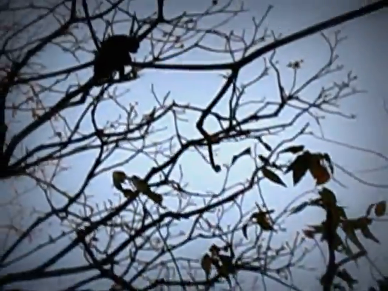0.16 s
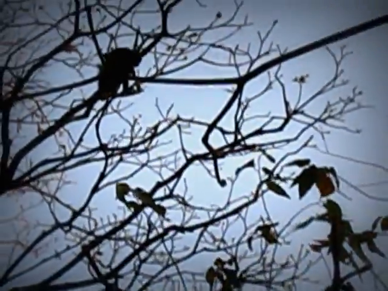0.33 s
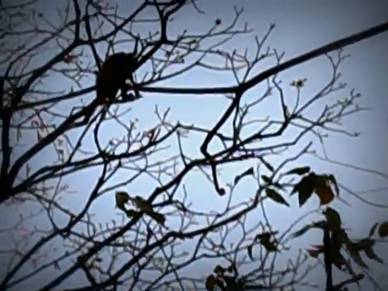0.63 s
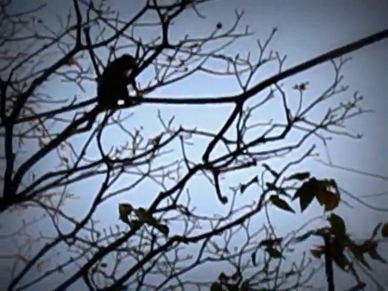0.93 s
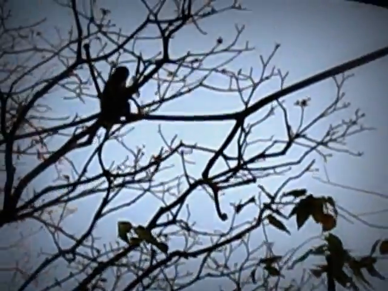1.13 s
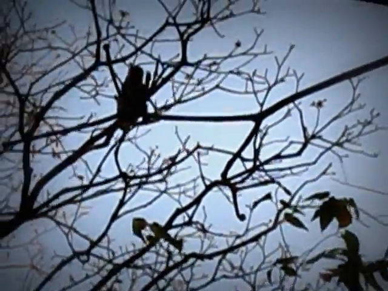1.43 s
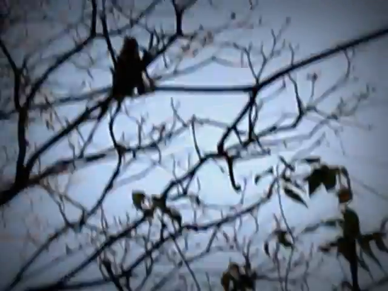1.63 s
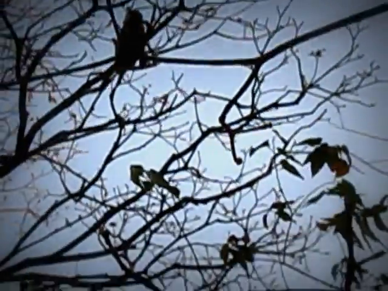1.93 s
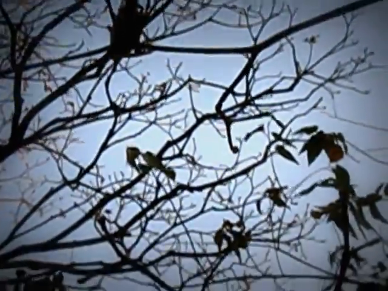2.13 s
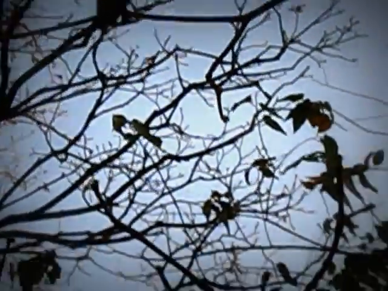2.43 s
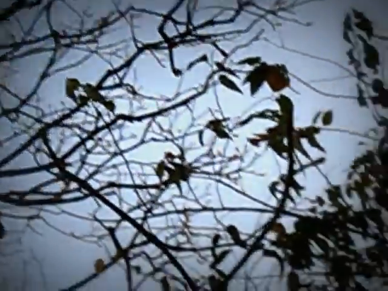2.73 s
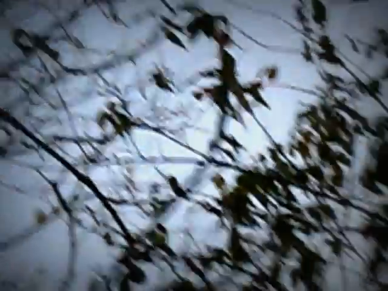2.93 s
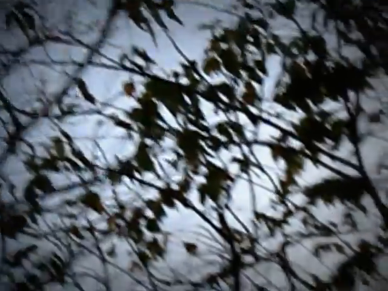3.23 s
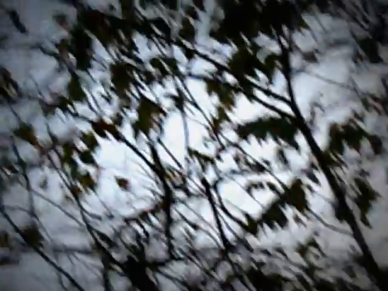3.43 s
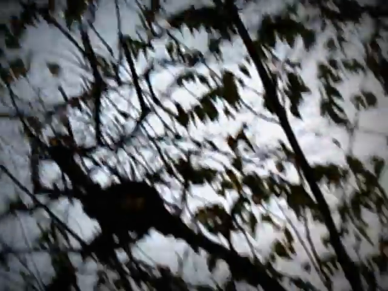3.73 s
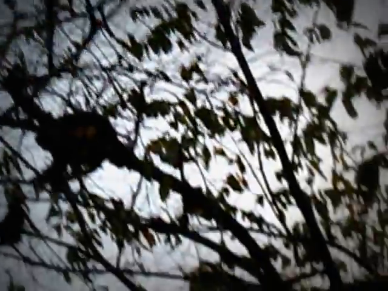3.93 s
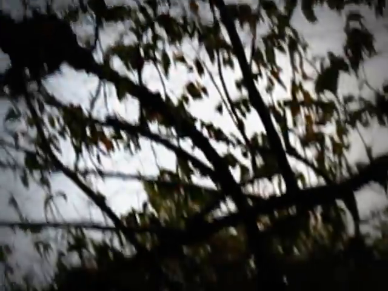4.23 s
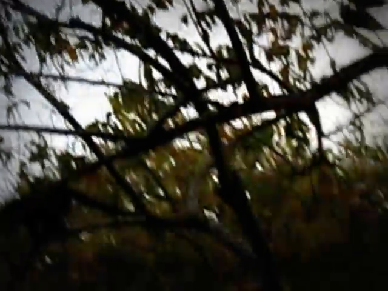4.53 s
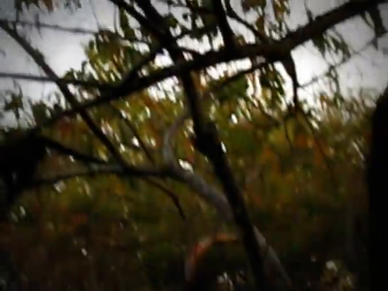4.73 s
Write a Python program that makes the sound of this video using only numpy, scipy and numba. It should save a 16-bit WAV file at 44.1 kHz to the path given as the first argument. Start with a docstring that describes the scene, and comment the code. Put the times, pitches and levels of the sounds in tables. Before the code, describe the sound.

One long guttural monkey roar fills the start, swelling unevenly with breathy heaves, rough barks from another animal and near-clear hoots, the strongest around 2.6 seconds. It then loses power, flutters in quick throbs, and dies in a low, breathy rumble before five seconds. The calls have a short, dull reverberation among trees. Soft hiss, slight wind on the microphone, and a few quiet bird notes and twig ticks surround them.

```python
"""Howler monkeys in bare treetops

A troop roars and dies away into a throbbing growl: chaotic vocal pulses ring the hyoid chamber, throat and
mouth, and lock at times into hoots, sine tones with an octave. A second animal barks hoarse syllables:
steadier pulses through band-pass resonances. Gliding sines make bird notes, narrow noise an insect's buzz,
decaying cosines and noise twig ticks; coloured noise makes the forest's hiss and the wind's rumble."""
import sys
import numpy as np
from scipy import signal
from scipy.fft import rfft, irfft
from scipy.io import wavfile
from scipy.ndimage import uniform_filter1d
from numba import njit

SR = 44100
rng = np.random.default_rng(int(sys.argv[2]) if len(sys.argv) > 2 else 0)


def magnitude_from_level(level_db):
    """Linear magnitude for a level in decibels (20 dB per decade)."""
    exponent = np.asarray(level_db, float) / 20
    return 10 ** exponent


def unload_audio(sound):
    """Save the sound as a 16-bit wav file, at the path given as the first command line argument."""
    columns = np.transpose(np.atleast_2d(sound))
    # keep every value between -1 and 1, then stretch to whole-number steps
    steps = np.round(np.clip(columns, -1, 1) * 32767)
    wavfile.write(sys.argv[1], SR, steps.astype(np.int16))


N = 214582

# heaves, when the breath is pushed out through a wide mouth: start_s, length_s, level_db
HEAVES = [(0.44, 0.46, -29), (1.126, 0.37, -28.5), (1.758, 0.42, -28)]


def level(x, db):
    """Normalization: scale a signal to an rms level."""
    return x * magnitude_from_level(db) / np.sqrt(np.mean(x ** 2))


def curves(rows):
    """Linear interpolation: the columns of a table as one value per sample."""
    s, *columns = np.transpose(rows)
    return [np.interp(np.arange(N) / SR, s, c) for c in columns]


def walk(rate):
    """Band-limited fluctuation: random levels held 1 / rate s and slewed twice; spread near 1."""
    hold = int(SR / rate)
    steps = np.repeat(rng.standard_normal(N // hold + 1), hold)
    return 1.3 * uniform_filter1d(uniform_filter1d(steps, hold), hold)[:N]


def window(t, start, length, edge=0.21):
    """Amplitude gating: linear ramps, each a share (edge) of the length, soften both ends."""
    return np.clip(np.minimum(t - start, start + length - t) / (edge * length), 0, 1)


@njit
def svf(x, hz, width):
    """State-variable filter: a band-pass with moving centre and width, gain 1 at the centre."""
    y, b, l = np.empty(len(x)), 0., 0.
    for i in range(len(x)):
        g, k = np.tan(np.pi * hz[i] / SR), width[i] / hz[i]
        v = (b + g * (x[i] - l)) / (1 + g * (g + k))
        b, l, y[i] = 2 * v - b, l + 2 * g * v, k * v
    return y


def ring(x, hz, width, skirt=6.0):
    """Cavity resonance: two band-passes in series, the second skirt times as wide, at unit level."""
    hz = hz + np.zeros(len(x))
    width = np.maximum(width, 10) + np.zeros(len(x))
    return level(svf(svf(x, hz, width), hz, skirt * width), 0)


def core(hz, waver_hz):
    """Frequency modulation: the wavering tone at the heart of a resonance, at unit level."""
    return np.sqrt(2) * np.sin(2 * np.pi * np.cumsum(hz + waver_hz) / SR)


def colour(x, points):
    """Spectral shaping: weight a sound by (Hz, dB) points on a log-frequency axis, at unit level."""
    hz, db = np.transpose(points)
    bins = np.maximum(np.fft.rfftfreq(N, 1 / SR), 1)
    gain = magnitude_from_level(np.interp(np.log(bins), np.log(hz), db))
    return level(irfft(rfft(x) * gain, N), 0)


@njit
def fire(hz, stretch, size):
    """Relaxation oscillation: a pulse at each wrap of the phase; each cycle has its own length and size."""
    pulses, p, k = np.zeros(len(hz) + 1), 0., 0
    for i in range(len(hz)):
        step = hz[i] * stretch[k] / SR
        p += step
        if p >= 1:
            p, k = p - 1, k + 1
            # two neighbouring samples share the pulse, which falls between them
            pulses[i] += size[k] * p / step
            pulses[i + 1] += size[k] * (1 - p / step)
    return pulses[:-1]


def folds(hz, jitter, scatter_db, noise_db, flutter_db):
    """Glottal source: vocal folds give uneven pulses and turbulent air, fluttering together."""
    chance = rng.standard_normal((N // 40, 2)).T
    pulses = fire(hz + np.zeros(N), np.exp(jitter * chance[0]), magnitude_from_level(scatter_db * chance[1]))
    turbulence = level(rng.standard_normal(N), noise_db)
    return (level(pulses, 0) + turbulence) * magnitude_from_level(flutter_db * walk(18))


def heaving(t):
    """Breath drive: how far the breath is heaved out, 0-1."""
    return sum(window(t, s, length, edge=0.055) for s, length, db in HEAVES)


def syllables(rows, t, edge):
    """Phrasing: successive rows as gate, progress 0-1, gliding pitch and level."""
    current = np.maximum(np.searchsorted([r[0] for r in rows], t) - 1, 0)
    s, length, first_hz, last_hz, db = np.transpose(rows)[:, current]
    along = np.clip((t - s) / length, 0, 1)
    return window(t, s, length, edge), along, first_hz + (last_hz - first_hz) * along, db


def forest_hiss():
    """Broadband noise: the forest hisses with a coloured spectrum and a slowly wavering level."""
    # spectrum of the hiss: frequency_hz, density_db (dB per Hz)
    forest_points = [(88, -51), (150, -0.5), (473, 7), (2290, -0.5), (2420, -4), (3250, -8.5), (3510, -3.5),
                     (6410, -13), (8100, -10), (15700, -24.5)]
    return magnitude_from_level(-38.5 + 1.5 * walk(12)) * colour(rng.standard_normal(N), forest_points)


def wind():
    """Flow noise: a light breeze rumbles in the microphone port as a gust dies exponentially."""
    gust_db = 12.5 * np.exp(-np.arange(N) / SR / 0.85)
    return magnitude_from_level(-57 + gust_db + 1.5 * walk(4)) * ring(rng.standard_normal(N), 82.0, 135.0, skirt=1.8)


def neighbours(t):
    """Small radiators: gliding tones for a bird, narrow noise for an insect, damped impulses for twigs."""
    # bird notes: start_s, length_s, first_hz, last_hz, level_db
    bird_notes = [(3.675, .05, 2200, 1750, -39), (3.69, .065, 2850, 2150, -37),
                  (3.912, .085, 2500, 1550, -34), (3.97, .04, 2600, 2200, -41),
                  (4.02, .04, 1780, 1700, -42), (4.54, .07, 1450, 1080, -44)]
    # thin insect buzz: start_s, length_s, centre_hz, width_hz, level_db
    insect_buzz = [(3.725, .018, 6700, 400, -47), (3.75, .06, 7300, 250, -50), (3.77, .08, 6780, 250, -50),
                   (4.12, .2, 6450, 300, -48), (4.125, .2, 9950, 400, -53)]
    # dry twig ticks: start_s, level_db, brightness_hz
    twig_ticks = [(1.3795, -32, 9100), (4.345, -16, 2250), (4.7336, -38, 8080)]
    out = np.zeros(N)
    for s, length, first_hz, last_hz, db in bird_notes:
        hz = np.interp(t, [s, s + length], [first_hz, last_hz])
        envelope = magnitude_from_level(db) * window(t, s, length, edge=.3) * magnitude_from_level(2.5 * walk(120))
        out += envelope * np.sin(2 * np.pi * np.cumsum(hz + 30 * walk(200)) / SR)
    for s, length, hz, width, db in insect_buzz:
        out += magnitude_from_level(db) * window(t, s, length) * ring(rng.standard_normal(N), hz, width)
    age = np.arange(400) / SR
    for s, db, hz in twig_ticks:
        modes = np.cos(2 * np.pi * hz * age) - np.cos(2 * np.pi * .62 * hz * age)
        snap = np.exp(-age / .002) * (modes + .1 * rng.standard_normal(400))
        # the dry crack
        snap += .6 * np.exp(-age / .0015) * uniform_filter1d(rng.standard_normal(400), size=6)
        out[int(s * SR):int(s * SR) + 400] += magnitude_from_level(db) * snap
    return out


def trees(x):
    """Reverberation: trunks and leaves scatter the calls into a short, dull, exponentially dying tail."""
    t60_s = 0.45
    age = np.arange(int(t60_s * SR)) / SR
    dull = uniform_filter1d(rng.standard_normal(len(age)), size=3)
    tail = dull * magnitude_from_level(-60 * age / t60_s) * (age > .012)
    return x + magnitude_from_level(-12.5) * signal.fftconvolve(x, tail / np.linalg.norm(tail))[:N]


def barks(t):
    """Source-filter voice: a second animal's steadier pulses give low partials and ring bright mouth modes."""
    # barked syllables: start_s, length_s, first_pulse_hz, last_pulse_hz, level_db
    bark_rows = [(.115, 0.27, 320, 334, -38), (.48, 0.17, 316.4, 262, -41), (.893, .22, 335.5, 330, -36.5),
                 (1.228, 0.19, 339.4, 322, -35), (1.505, 0.212, 317.4, 324, -36.5),
                 (1.825, 0.21, 348, 272, -35)]
    # bright mouth resonances: centre_hz, width_hz, relative_db
    bark_modes = [(4144, 390, 2), (4640, 470, 1), (3300, 66, -3)]
    gate, along, hz, db = syllables(bark_rows, t, edge=0.09)
    heave = heaving(t)
    # each syllable has an accent; in a heave it comes late
    place = np.where(heave > .5, 0.835, 0.19)
    accent_db = np.where(heave > .5, 6.5, 9.1)
    accent = np.exp(-((along - place) / 0.065) ** 2)
    # at the accent the pulses lock and the partials stand clear
    source = folds(hz, jitter=.025, scatter_db=2., noise_db=-2., flutter_db=2.)
    clear = folds(hz, jitter=.003, scatter_db=1., noise_db=-20., flutter_db=1.)
    locked = accent * (0.69 + 0.46 * heave)
    mouth = (1 - 0.8 * locked) * source + magnitude_from_level(3.5) * locked * clear
    bright = sum(magnitude_from_level(mode_db) * ring(mouth, f, w, skirt=0.84) for f, w, mode_db in bark_modes)
    bright *= magnitude_from_level(accent_db * accent + 1.8 * walk(70.5))
    nose = magnitude_from_level(-11.5 + 15.9 * heave) * ring(source, 1935, 54.0)
    first = magnitude_from_level(np.interp(along, [0, 1], [10.5, 10.8])) * ring(source, hz, 49.0)
    third = magnitude_from_level(np.interp(along, [0, 1], [1.5, 4.3])) * ring(source, 3 * hz, 52.0)
    return gate * magnitude_from_level(db) * (bright + nose + first + third)


def hoots(t):
    """Mode locking: where the folds lock to the chamber one hears a nearly clear note and its octave."""
    # clear notes: start_s, length_s, first_hz, last_hz, level_db
    hoot_rows = [(.05, 0.38, 406.7, 392, -23), (.81, 0.41, 395, 364.3, -16.5),
                 (1.48, 0.12, 385.7, 374.5, -17), (1.6, 0.24, 369.2, 352, -19),
                 (2.085, .385, 418.5, 414.7, -17), (2.47, 0.12, 461.1, 482, -18.5),
                 (2.59, 0.27, 481.8, 426.5, -13)]
    gate, along, hz, db = syllables(hoot_rows, t, edge=0.034)
    phase = 2 * np.pi * np.cumsum(hz * (1 + 0.008 * walk(60.02))) / SR
    # the octave is loudest at 709 Hz, where the throat favours it, and 6 dB less 38 Hz away
    octave_db = -0.4 - 6 * np.abs(2 * hz - 709) / 38
    note = np.sin(phase) + magnitude_from_level(octave_db) * np.sin(2 * phase)
    return np.sqrt(2) * gate * magnitude_from_level(db + 1.54 * walk(45.25)) * note


def throbbing(t):
    """Amplitude modulation: the level in dB rises at each throb of the growl and sinks between."""
    # throbs: time_s, peak_db
    throbs = [(3.335, 4), (3.39, 4), (3.44, 4), (3.495, 4), (3.512, 3), (3.562, 2), (3.61, 3), (3.663, 3),
              (3.718, 3), (3.775, 3), (3.845, 4), (3.922, 3), (3.972, 3)]
    # level between the throbs: time_s, dip_db
    growl_dips = [(3.27, 0), (3.33, -4), (3.55, -7), (3.8, -6), (3.95, -3), (4.02, 0)]
    dip_db = curves(growl_dips)[0]
    gaps_s = np.gradient(np.transpose(throbs)[0])
    throb_db = dip_db
    for (s, db), gap_s in zip(throbs, gaps_s):
        throb_db = throb_db + (db - dip_db) * np.exp(-((t - s) / (0.51 * gap_s)) ** 2 * 2)
    return throb_db


def deep_cavities(t, source, growl, centres_hz, levels_db):
    """Coupled resonators: chamber and throat ring in opposite polarity, each with a wavering core."""
    # the loudest brief swells of the roar's uneven flutter;
    # a list for the chamber, then one for the throat: time_s, peak_db
    swell_rows = ([(.04, -13), (.096, -9), (.385, -9), (.45, -20), (.49, -12), (.557, -13.5), (.721, -14),
                  (.821, -12), (.873, -13.5), (1.117, -11), (1.249, -22), (1.306, -26), (1.349, -11),
                  (1.403, -13), (1.46, -11), (1.735, -11), (1.819, -14), (1.864, -19), (2.102, -8.5),
                  (2.207, -29), (2.278, -12.5), (2.355, -15), (2.418, -18), (2.475, -9), (3.144, -21.5),
                  (3.19, -21), (3.565, -19), (3.615, -25), (3.665, -26), (4.612, -30)], [(.024, -34),
                  (.065, -32), (.187, -20), (.447, -16), (.484, -21), (.61, -14), (.647, -26), (.695, -21),
                  (.94, -19.5), (1.343, -20), (1.456, -21), (1.544, -16), (1.632, -15.5), (1.784, -13),
                  (1.912, -13), (1.999, -12.5), (2.063, -11.5), (2.31, -14), (2.4, -13.5), (2.64, -16),
                  (2.846, -11), (2.891, -14), (2.983, -15.5), (3.133, -13), (3.214, -21), (3.512, -26),
                  (3.61, -23), (3.663, -22), (3.72, -23), (3.775, -22), (3.922, -26), (4.575, -30),
                  (4.612, -26)])
    widths_hz = (46, 89.9)
    # the last breath loses tone and the cavities ring wider
    spent = np.interp(t, (3.95, 4.15), [0, 1])
    wider = 1.35 ** spent
    (chamber_hz, throat_hz), (chamber_db, throat_db) = centres_hz, levels_db
    low = magnitude_from_level(chamber_db) * ring(source, chamber_hz, wider * widths_hz[0])
    low -= magnitude_from_level(throat_db) * ring(source, throat_hz, wider * widths_hz[1], skirt=6.8)
    for hz, db, width, swells in zip(centres_hz, levels_db, widths_hz, swell_rows):
        # a swell falls to 1/e within 13 ms on either side
        swell = sum(magnitude_from_level(peak_db) * np.exp(-((t - s) / .013) ** 2) for s, peak_db in swells)
        steady = (1 - .55 * spent) * magnitude_from_level(db - 5) * growl
        waver_hz = .45 * width * (.8 * walk(70) + .5 * walk(20))
        low += np.hypot(steady, swell) * core(hz, waver_hz)
    # the slack folds rumble in the chest
    chest = ring(source, 370.0, 181.0, skirt=4.28)
    return low + magnitude_from_level(throat_db - 14.5) * window(t, 3.364, 0.88) * chest


def wide_breath(t, source, tired, levels_db, opening_db):
    """Turbulent spectrum: breath fills the space around the resonances and a third cavity rings in it."""
    # colour of the fresh breath: frequency_hz, density_db (dB per Hz)
    fresh_points = [(88, -77), (150, -21), (268, -9.5), (400, 1.5), (561, 0), (812, 1.5), (1650, -42),
                    (2130, -18), (2750, -32.5), (3620, -16), (4550, -28), (5500, -28.5), (7000, -23),
                    (9100, -62), (15400, -120)]
    # the colour it sinks into: frequency_hz, density_db (dB per Hz)
    tired_points = [(110, -48), (180, -19), (269, -8.5), (410, 0.5), (584, 13), (775, 3), (1210, -48),
                    (1530, -18), (3000, -15.5), (3900, -69.5), (6600, -120)]
    chamber_db, throat_db = levels_db
    breath = (1 - tired) * colour(source, fresh_points) + tired * magnitude_from_level(-1.5) * colour(source, tired_points)
    breath *= magnitude_from_level(-7.5) * np.hypot(magnitude_from_level(chamber_db), magnitude_from_level(throat_db))
    stages_s = [2.1, 2.3, 3.4, 4.2]  # the heaves are over, settled, tired, spent
    heave = heaving(t)
    third_hz = np.interp(t, stages_s, [1416, 1424, 1424, 1540]) + 64 * heave
    third_width_hz = np.interp(t, stages_s, [55.0, 94.0, 90, 129]) + 70 * heave
    over_effort_db = np.interp(t, stages_s, [-3.5, -3.5, -5.5, -4])
    third_db = throat_db + over_effort_db + 0.66 * opening_db + 0.85 * walk(14)
    return breath + magnitude_from_level(third_db) * ring(source, third_hz, third_width_hz)


def wide_mouth(t, source):
    """Formant: in each heave the wide-open mouth rings, sinking slightly in pitch."""
    high = np.zeros(N)
    for s, length, db in HEAVES:
        hz = np.interp(t, [s, s + length], (3623, 3566))
        high += window(t, s, length, edge=0.17) * magnitude_from_level(db) * ring(source, hz, 135, skirt=9.2)
    return high


def gliding_lines(t, source):
    """Narrow-band filtering: short lines glide in pitch, each a sharp resonance around a clear core."""
    # narrow gliding lines: mouth resonances above; throat strands, bark partials and a hoot's octave
    # below: start_s, length_s, first_hz, last_hz, level_db
    line_rows = [(0, .35, 2318, 2028, -30), (.004, 0.082, 3844, 3720, -31), (.071, .2, 1468, 1378, -28),
                 (0.118, 0.36, 3820, 3560, -34.5), (.134, .13, 534.3, 533, -25), (.2, .16, 821, 848, -20.5),
                 (0.277, 0.076, 1032, 1024, -20.5), (.356, .05, 1398, 1380, -28.5),
                 (.394, 0.29, 4300, 3870, -36), (.395, 0.37, 2285, 2120, -34.5),
                 (0.45, 0.085, 1026, 1027, -25), (0.515, 0.18, 902, 878, -21.5),
                 (.53, 0.062, 2300, 2280, -23.5), (0.599, 0.074, 4560, 4600, -33),
                 (.68, 0.39, 2150, 2095, -31.5), (0.865, 0.221, 1380, 1377, -30.5),
                 (0.879, .35, 3700, 3522, -35), (0.971, 0.071, 962, 979, -23.5),
                 (1.08, 0.28, 2114, 2127, -34), (1.22, .24, 1520, 1480, -35.5),
                 (1.288, 0.18, 1860, 1900, -38), (1.345, 0.084, 951, 960, -30),
                 (1.359, .15, 2135, 2060, -35), (1.495, 0.33, 757, 706, -19), (1.5, .28, 2060, 2220, -37),
                 (1.508, .32, 1365, 1389, -36), (1.531, 0.2, 929, 956, -27.5),
                 (1.537, 0.27, 3720, 3600, -39.5), (1.627, 0.17, 3298, 3264, -46),
                 (1.749, 0.21, 2300, 2190, -42), (1.828, .32, 2152, 2113, -35), (1.84, .3, 1540, 1478, -36),
                 (2.099, 0.36, 4400, 4360, -46), (2.172, 0.28, 2260, 2330, -42.5),
                 (2.192, 0.27, 3450, 3500, -46), (2.2, 0.31, 5170, 4960, -41),
                 (2.225, 0.24, 2460, 2340, -42.5), (2.271, 0.22, 3946, 3950, -39.5),
                 (2.44, .28, 3480, 3600, -51), (2.46, 0.59, 4950, 4860, -42), (2.471, .25, 4147, 4025, -34),
                 (2.575, 0.11, 2536, 2410, -41), (2.699, 0.2, 3560, 3410, -42),
                 (2.722, 0.18, 4014, 3980, -44), (2.943, 0.21, 5000, 5040, -47),
                 (2.965, 0.5, 3286, 3415, -51), (3.023, 0.3, 3950, 4030, -54),
                 (3.2, .35, 4980, 5136, -37.5), (3.329, 0.24, 4090, 4052, -42.5),
                 (3.33, 0.19, 5200, 5310, -38), (3.499, .18, 3440, 3635, -41),
                 (3.608, .097, 1030, 1020, -37), (3.651, 0.2, 3600, 3360, -40),
                 (3.751, 0.19, 1521, 1535, -51), (3.807, .075, 5200, 4860, -47),
                 (3.82, .043, 876, 848, -22), (3.86, 0.13, 3323, 3000, -48.5),
                 (3.886, .07, 4380, 4530, -50)]
    lines = np.zeros(N)
    waver = walk(150)
    for s, length, first_hz, last_hz, db in line_rows:
        part = slice(int(s * SR), int((s + length) * SR))
        hz = np.interp(t[part], [s, s + length], [first_hz, last_hz])
        # the width is 46.1 Hz at 2560 Hz and grows with a power of the pitch
        width = 46.1 * (hz / 2560) ** 1.62
        whistle = magnitude_from_level(-3) * core(hz, .45 * width * waver[part])
        line = ring(source[part], hz, width, skirt=11.0) + whistle
        lines[part] += window(t[part], s, length, edge=0.11) * magnitude_from_level(db) * line
    return lines


def rasp_and_air(t, source, tired, rasp_db, flow):
    """Jet turbulence: a broad rasp and puffs of hissing air follow effort and mouth opening."""
    # spectrum of the air: frequency_hz, density_db (dB per Hz)
    air_points = [(3820, -10), (4600, -4.5), (5300, -14), (6500, -6), (7180, -8), (8200, -8.5), (9540, -13),
                  (12100, -16), (13200, -19), (14700, -26), (15700, -36)]
    # treble resonances in the air: centre_hz, width_hz, relative_db
    air_modes = [(6400, 260, -7), (7400, 300, -14), (8200, 300, -10), (9200, 320, -14), (10200, 350, -14),
                 (11000, 350, -19), (12100, 380, -17)]
    # the rasp steps down in pitch at 2.5 s
    rasp_hz, rasp_width_hz = np.where(t > 2.5, 5210, 5625), np.where(t > 2.5, 700, 780)
    rasp = ring(source, rasp_hz, rasp_width_hz, skirt=0.97)
    rasp += magnitude_from_level(-9.0) * ring(source, 6184, 250.0, skirt=0.37)
    swell = walk(20)
    air = colour(rng.standard_normal(N), air_points)
    for hz, width, db in air_modes:
        mode = ring(source, hz * (1 + .012 * walk(3)), width, skirt=2.5)
        air += magnitude_from_level(db - 2.5 + 3.5 * walk(14)) * mode
    puffs_db = 1.4 * flow + 2.2 * swell + .6 * walk(11)
    # the tired breath hisses 1 dB less
    air *= magnitude_from_level(-25 + .5 * rasp_db - tired + puffs_db)
    rasp *= magnitude_from_level(-1.5 + rasp_db + 0.48 * flow + 0.82 * swell)
    return rasp + window(t, -0.93, 5.43, edge=0.061) * air


def roar(t):
    """Source-filter voice: chaotic pulses ring every cavity of the throat; late in the howl it throbs."""
    # the howl: time_s, effort_db, chamber_hz, throat_hz, chamber_coupling_db, mouth_opening_db
    howl_rows = [(0, -15, 420.3, 797.4, -5, -18.5), (.12, -19, 426, 811, -4, -11),
                 (.34, -17, 423, 858.5, -6.5, -17.5), (.42, -19, 438.7, 848.8, 1, -15),
                 (.63, -14.5, 441.6, 887, -8, -17.5), (.84, -19, 435, 813.6, 1, -12),
                 (1.06, -19.5, 433.2, 778, -16, -15.5), (1.14, -18, 429, 794, -6.5, -15),
                 (1.27, -17.5, 436.5, 837, -2, -14.5), (1.44, -17, 438.9, 801, -2, -17),
                 (1.56, -18.5, 432, 764, -6, -16.5), (1.74, -20, 424.2, 743, -10, -17.5),
                 (1.86, -17, 442.5, 847, 0, -16), (2.08, -20.5, 424, 817.2, -1.5, -13.5),
                 (2.42, -17.5, 421.4, 809.7, 0, -18), (2.62, -19, 476.6, 879.4, -0.5, -14.5),
                 (2.84, -25.5, 440.8, 827, -33, -11.5), (2.92, -25, 456, 798.5, -5.5, -11.5),
                 (3.3, -19.5, 447.6, 830.2, -4.5, -11.5), (3.5, -21, 454.3, 777.6, -8, -10.5),
                 (3.64, -20, 454, 752.4, -5.5, -25), (3.85, -21.5, 456, 802, -3, -20),
                 (3.98, -22, 426.3, 758, -5.5, -15.5), (4.09, -26.5, 467, 690, -9.5, -30),
                 (4.3, -29, 485, 729, -0.5, -25), (4.525, -29, 489, 734, -4, -27),
                 (4.545, -32, 482, 722, -2, -36), (4.56, -26.5, 480.5, 726, -13, -30),
                 (4.618, -26, 485.6, 715, -8, -27), (4.632, -38, 476, 741, -5, -29),
                 (4.83, -64, 460, 755, 0, -24)]
    throat_db, chamber_hz, throat_hz, coupling_db, opening_db = curves(howl_rows)
    chamber_db = throat_db + coupling_db + 1.4 * walk(8.48)
    centres_hz, levels_db = (chamber_hz, throat_hz), (chamber_db, throat_db)
    tired = np.interp(t, (2.9, 3.5), [0, 1])
    source = folds(230, jitter=.45, scatter_db=3.0, noise_db=2.5, flutter_db=.5 - .1 * tired)
    # the folds beat strong and weak in uneven groups, near 62 a second
    growl = magnitude_from_level(2.5 * np.sin(2 * np.pi * np.cumsum(62 * (1 + .25 * walk(15))) / SR))
    source = source * growl
    # uneven airflow, felt most in the treble
    flow = .7 * walk(25) + .7 * walk(55)
    throb_db = throbbing(t)
    low = deep_cavities(t, source, growl, centres_hz, levels_db) * magnitude_from_level(throb_db + 0.4 * flow)
    # the wide breath feels the throb less than the deep cavities, the layers after it not at all
    breath = wide_breath(t, source, tired, levels_db, opening_db) * magnitude_from_level(.75 * throb_db + flow)
    high = (wide_mouth(t, source) + gliding_lines(t, source)) * magnitude_from_level(flow)
    return low + breath + high + rasp_and_air(t, source, tired, throat_db + opening_db, flow)


def scene():
    """Superposition: monkeys ring among the trees, with neighbours, the forest's hiss and wind."""
    t = np.arange(N) / SR
    calls = trees(roar(t) + hoots(t) + barks(t))
    return (calls + neighbours(t) + forest_hiss() + wind())[None]


def roll_off(x):
    """The treble ends steeply here."""
    return signal.sosfilt(signal.butter(12, 16130, fs=SR, output="sos"), x)


def record(dry):
    """Soft saturation: a hyperbolic tangent rounds the loudest peaks."""
    mix = np.tanh(0.56 * dry) / 0.76
    return roll_off(mix)


dry = scene()
out = record(dry)
unload_audio(out)
```